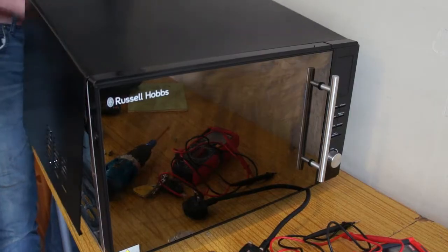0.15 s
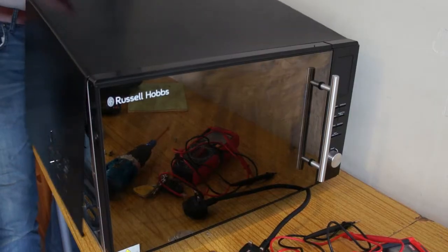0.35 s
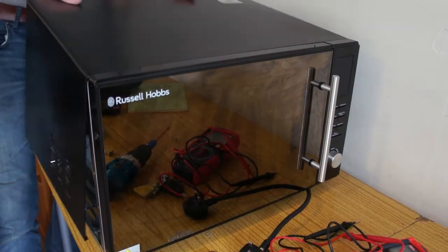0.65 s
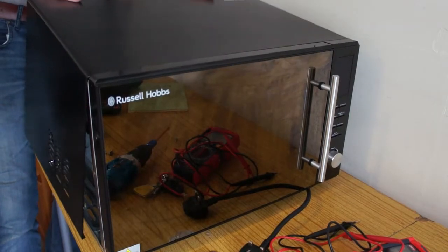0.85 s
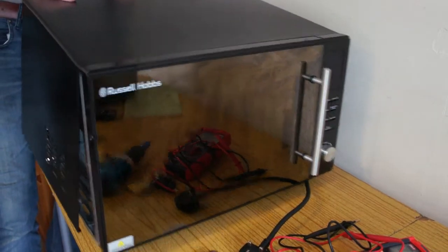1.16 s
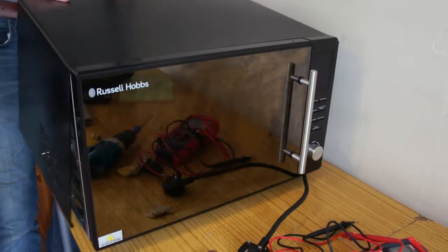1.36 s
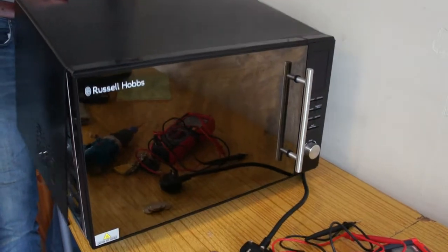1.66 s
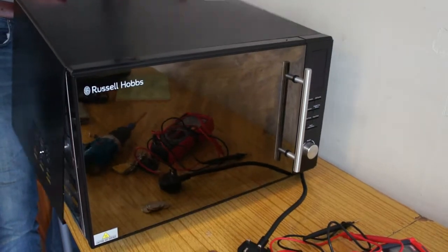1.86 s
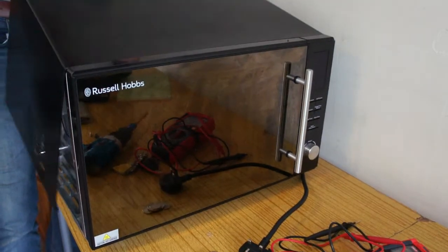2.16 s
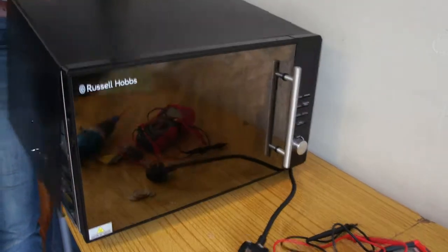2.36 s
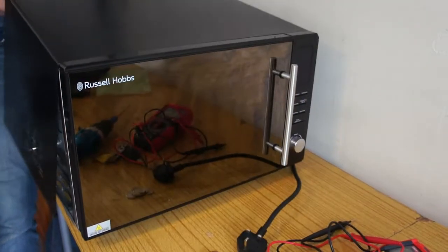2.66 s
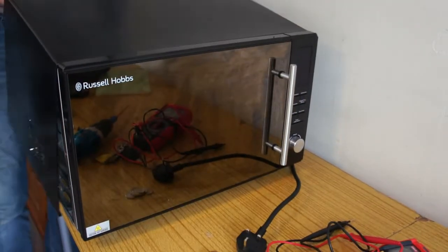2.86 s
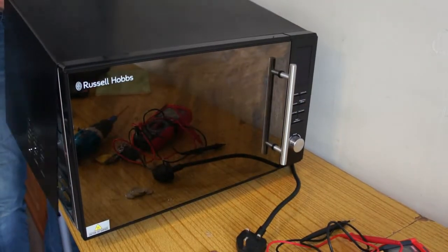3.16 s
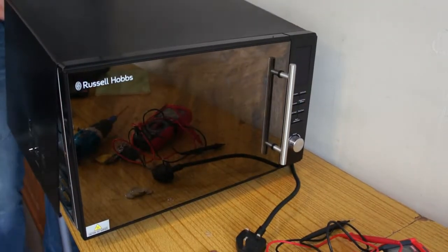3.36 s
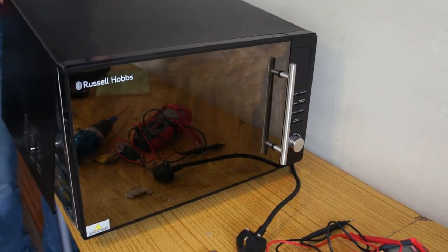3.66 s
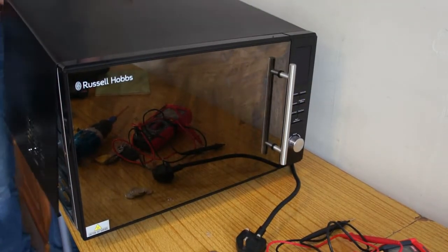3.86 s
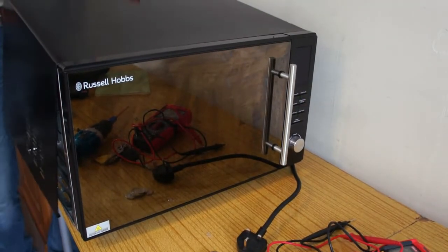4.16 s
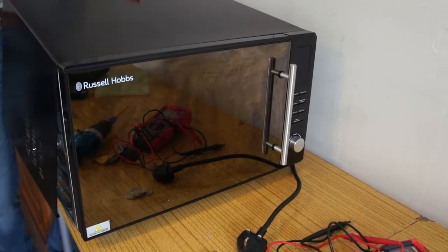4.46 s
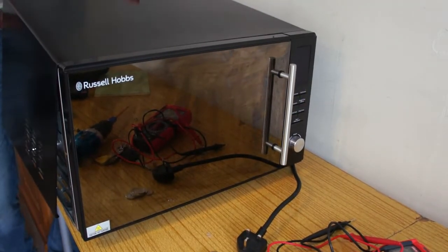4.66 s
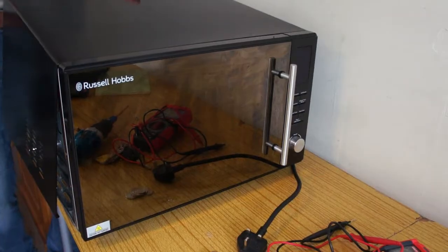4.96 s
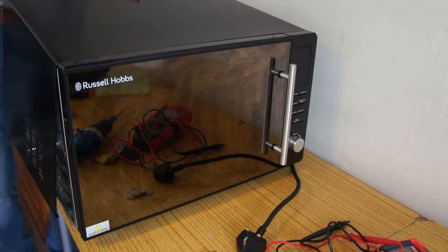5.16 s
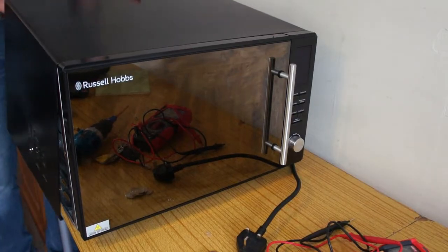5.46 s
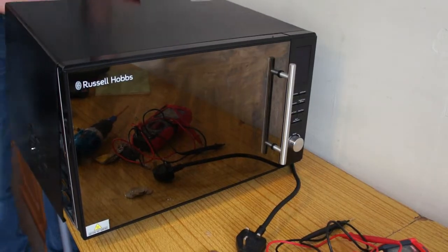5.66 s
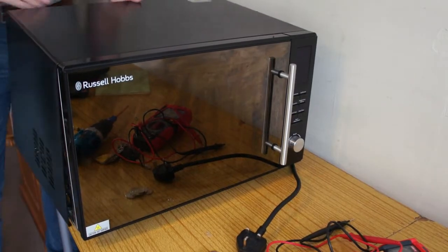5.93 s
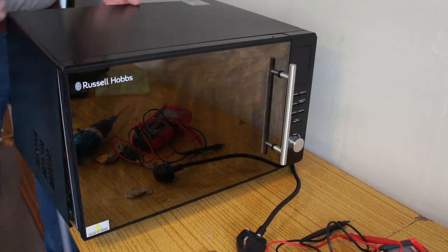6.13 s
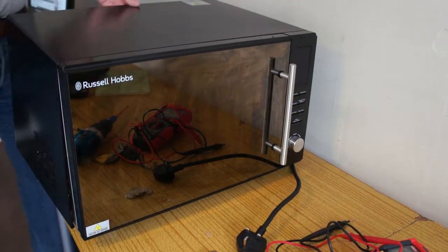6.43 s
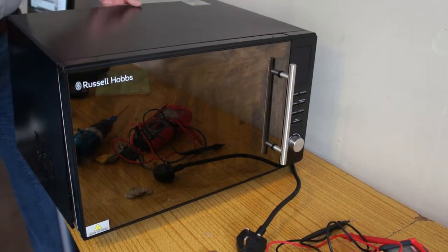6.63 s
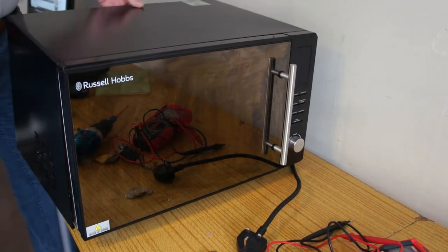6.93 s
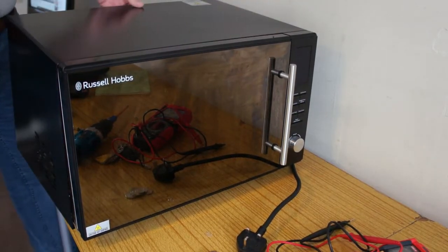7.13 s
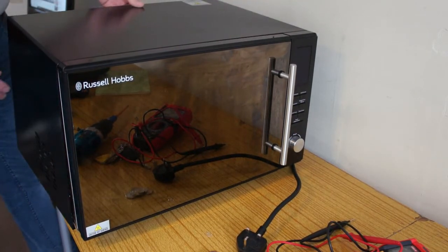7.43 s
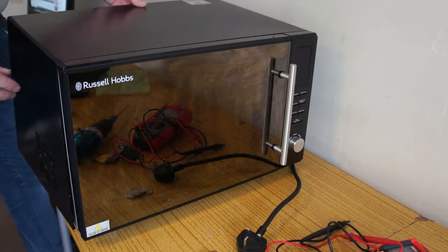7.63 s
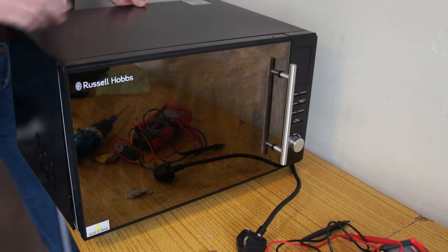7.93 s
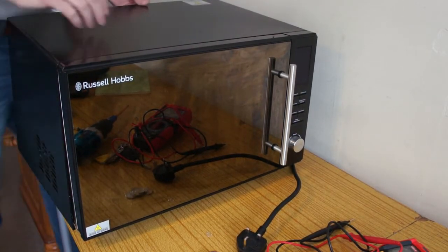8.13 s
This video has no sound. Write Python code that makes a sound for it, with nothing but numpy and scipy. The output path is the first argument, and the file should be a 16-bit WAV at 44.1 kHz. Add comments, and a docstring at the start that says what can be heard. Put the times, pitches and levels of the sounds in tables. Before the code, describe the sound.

A thin steel appliance cover is worked loose indoors, with loud clangs, scrapes and hollow booms early, then sparse light knocks and clicks.

```python
"""Sheet-steel cover worked loose

A thin steel cover comes off an appliance in a small room: its edges click, knock, scrape and squeak
on the chassis, and its big panels boom and pop. Shaped noise and tones follow timed contacts;
noise forces ring the modes of the sheet. The room answers briefly over a quiet hiss.
"""
import sys
import numpy as np
from scipy import signal
from scipy.fft import rfft, irfft, next_fast_len
from scipy.io import wavfile
from scipy.ndimage import map_coordinates

SR = 44100
rng = np.random.default_rng(int(sys.argv[2]) if len(sys.argv) > 2 else 0)


def digitize_waveform(pressure):
    """Quantize a signal to 16-bit integers and store it at the path in sys.argv[1].

    Rows of a 2-D input are taken as channels; values are limited to [-1, 1].
    """
    field = np.atleast_2d(pressure).T
    bounded = np.clip(field, -1, 1)
    quanta = np.round(bounded * 32767).astype(np.int16)
    wavfile.write(sys.argv[1], SR, quanta)


N = 365588


def amp(db):
    """Linear gain of a dB value."""
    return 10 ** (np.asarray(db) / 20)


def unit(x):
    """x scaled to rms 1."""
    return x / np.sqrt(np.mean(x ** 2, axis=-1, keepdims=True) + 1e-20)


def along(points, hz):
    """Interpolates (frequency [Hz], value) points on a log frequency axis."""
    f, v = np.transpose(points)
    return np.interp(np.log(hz + 1), np.log(f + 1), v)


def curves(rows, outside=None):
    """One value per sample for each column after the time."""
    s, *cols = np.transpose(rows)
    return [np.interp(np.arange(N) / SR, s, c, outside, outside) for c in cols]


def wobble(knots_per_s):
    """A smooth random curve."""
    knots = rng.standard_normal(int(N * knots_per_s / SR) + 4)
    return map_coordinates(knots, [np.arange(N) * knots_per_s / SR])


def filtered(x, response):
    """x times a complex response of frequency."""
    n = x.shape[-1]
    m = next_fast_len(n + 8192)
    return irfft(rfft(x, m) * response(np.fft.rfftfreq(m, 1 / SR)), m)[..., :n]


def coloured(x, points):
    """x with the given spectrum, rms 1."""
    return unit(filtered(x, lambda hz: amp(along(points, hz))))


def spread(pair, alike):
    """Two unrelated signals become left and right with a set correlation per frequency."""
    def turn(hz):
        return np.arccos(np.clip(along(alike, hz), -1, 1)) / 2
    mid, side = filtered(pair, lambda hz: np.array([np.cos(turn(hz)), np.sin(turn(hz))]))
    return np.array([mid + side, mid - side])


def gestures(s, held, db, rise, sag, fall):
    """Gain of gestures that rise, are held and die away at steady dB rates; their powers add."""
    t = np.arange(0, N + 64, 64) / SR
    since = t - np.reshape(s, (-1, 1))
    held, fall = np.reshape(held, (-1, 1)), np.reshape(fall, (-1, 1))
    shape_db = rise * np.minimum(since, 0)
    shape_db = shape_db - sag * np.clip(since, 0, held)
    shape_db = shape_db - fall * np.maximum(since - held, 0)
    power = np.sum(amp(np.reshape(db, (-1, 1)) + shape_db) ** 2, axis=0)
    return np.interp(np.arange(N) / SR, t, np.sqrt(power))


RADIATES_HZ = 250


def small(x):
    """A small source radiates little bass: second-order high-pass."""
    return filtered(x, lambda f: (1j * f / (RADIATES_HZ + 1j * f)) ** 2)


# modes of the cover: (frequency [Hz], width [Hz], level [dB])
SHEET_MODES = [(102, 7.7, -8), (169.3, 4.9, -3), (183.7, 23, 4), (254.3, 7.9, 10.5), (284.8, 5.5, 1.5),
               (364.5, 10.6, 4), (380.2, 12, -0.5), (430, 22, -6), (465.5, 44, 0), (536, 5.7, -14),
               (696, 74, -23), (672.7, 11, 8), (783, 3.5, -2), (897, 7, 3), (941, 21, -4.5),
               (991.6, 14, 6.5), (1133, 21, -0.5), (1206, 7.7, 6), (1314, 19, -12.5), (1323, 9.4, -2),
               (1370, 260, -9), (1562, 13, 8), (1666, 99, -5.5), (1768, 14, 5), (1835.5, 29, -1.5),
               (2025, 72, -20), (2165, 8.1, 2), (2454, 24, 3.5), (2660, 51, -7.5), (2910, 20, 8),
               (3080, 480, -6.5), (3157, 40, 7.5), (3557, 71, 0.5), (4310, 38, 7), (4913, 23, -12)]
LEAST_LOSS = .011  # least mode width as a share of its frequency: hands damp the sheet


def sheet(force, scatter_db=0):
    """The cover passes the force and rings at its modes; scatter gives each row its own mode strengths."""
    c, w, db = np.transpose(SHEET_MODES)[..., None]
    w = np.maximum(w, LEAST_LOSS * c)
    sign = (-1) ** np.arange(len(SHEET_MODES))
    gains = sign * amp(db[:, 0] + scatter_db)
    return filtered(force, lambda f: 1 + gains @ (1j * f * w / (c * c - f * f + 1j * f * w)))


# hiss colour: (frequency [Hz], relative level [dB])
HISS_COLOUR = [(25, -5), (50, -13), (100, -30), (130, -26), (170, -13), (280, -3), (600, -8), (1200, -4.5),
               (3000, -9.5), (6000, -14), (10000, -21), (16000, -33)]
# left-right likeness of diffuse sound: (frequency [Hz], correlation [0-1])
DIFFUSE_ALIKE = [(30, .6), (80, .985), (300, .97), (700, .88), (1500, .5), (3000, .02), (16000, .05)]


def hiss():
    """Room tone and microphone noise: steady coloured noise."""
    return amp(-55.5) * spread(coloured(rng.standard_normal((2, N)), HISS_COLOUR), DIFFUSE_ALIKE)


# reverberation: (frequency [Hz], t60 [s])
ROOM_T60 = [(150, 0.87), (500, 0.22), (1500, 0.41), (4000, 0.27), (10000, 0.3)]


def room(x):
    """Noise tails die at a rate set per frequency; each third of a second gets its own echo pattern."""
    hop, out = SR // 3, np.zeros((2, N + SR))
    delay = 200  # samples
    for start in range(0, N, hop):
        hz, t, z = signal.stft(rng.standard_normal((2, SR // 2)), SR, nperseg=256)
        decay = amp(-60 * t / along(ROOM_T60, hz)[:, None])
        tail = signal.istft(z * decay, SR, nperseg=256)[1]
        tail = tail / np.linalg.norm(tail[0])
        wet = signal.fftconvolve(x[None, start:start + hop], tail, axes=1)
        out[:, start + delay:start + delay + wet.shape[1]] += wet
    return spread(out[:, :N], DIFFUSE_ALIKE)


# panel buckling: (time at full strength [s], held [s], relative level [dB])
BUCKLES = [(.09, 0, -41), (.385, 0.12, -44.5), (.46, 0.31, -46), (.69, 0.024, -36.5), (.79, 0.12, -48),
           (1.172, 0.11, -29), (1.342, 0.064, -14.5), (1.49, 0.025, -22), (1.713, 0.15, -18),
           (1.974, 0, -20.5), (2.05, 0, -29), (2.15, 0.032, -37.5), (2.361, 0, -20), (2.467, 0.011, -19.5),
           (2.57, 0.108, -20.5), (2.749, 0.0082, -25), (2.841, 0.049, -34.5), (2.95, 0.12, -34.5),
           (3.12, 0.15, -41), (3.384, 0.047, -28), (3.529, 0.0062, -29.5), (3.6, 0.0082, -38),
           (3.72, 0.41, -42), (4.19, 0.35, -48), (4.47, 0.066, -41.5), (4.63, 0.29, -41.5),
           (4.92, 0.052, -40.5), (5.17, 0, -39), (5.4, 0.11, -41.5), (5.56, 0.2, -38.5), (5.7, 0.12, -39),
           (5.93, 0.023, -44), (6.05, 0.17, -44.5), (6.3, 0.29, -49), (6.432, 0.049, -46), (6.54, 0, -42),
           (6.82, 0.03, -54.5), (6.98, 0, -50), (7.1, 0, -58), (7.69, 0.025, -49)]
# trembling in the hands: (time [s], relative rustle level [dB], relative deep rumble level [dB])
TREMBLES = [(0, -43.5, -68), (.2, -51.5, -70), (.4, -44.5, -43), (.7, -53.5, -74), (1.15, -51.5, -53.5),
            (1.55, -38.5, -53), (1.9, -25.5, -30.5), (2.2, -42.5, -45), (2.52, -20, -26.5),
            (2.75, -32, -38), (3.15, -53, -43.5), (3.55, -39.5, -55), (4.25, -54, -54), (4.66, -55, -50),
            (4.8, -43, -46.5), (5.47, -47, -62), (5.7, -34.5, -70), (5.86, -49.5, -67.5),
            (6.83, -52.5, -54.5), (7.6, -57, -67), (7.99, -57, -85), (8.15, -47, -87), (8.29, -63, -82)]
# colours of the forces: (frequency [Hz], relative level [dB])
BOOM_COLOUR = [(60, -59), (110, -8), (160, -0.5), (300, 3), (500, -1.5), (900, -24), (3000, -79.5)]
DEEP_COLOUR = [(20, -47), (50, -33.5), (80, -2.5), (110, -11), (150, 0), (300, -72)]
RUSTLE_COLOUR = [(70, -37), (150, -8), (260, 2.5), (450, 3), (900, 1.5), (1600, -5.5), (3200, -9.5),
                 (4500, -13.5), (12000, -30.5)]
SWELL_DB_PER_S, SAG_DB_PER_S, DAMP_DB_PER_S = 536, 17, 172  # rise, loss while held, decay
DEEP_DB, DEEP_DAMP_DB_PER_S = -16, 64  # the lowest modes start weaker and ring longer


def panels():
    """Buckling drives the low modes in lumps; trembling adds deep rumble and a rustle of loose edges."""
    s, held, db = np.transpose(BUCKLES)
    rustle_db, rumble_db = curves(TREMBLES)
    forces = []
    for colour in (BOOM_COLOUR, DEEP_COLOUR, RUSTLE_COLOUR):
        lumps = rng.standard_normal((2, N)) * amp(2.45 * wobble(26))
        forces.append(coloured(lumps, colour))
    boom, deep, rustle = unit(sheet(np.array(forces)))
    booming = gestures(s, held, db, SWELL_DB_PER_S, SAG_DB_PER_S, DAMP_DB_PER_S)
    ringing = gestures(s, held, db + DEEP_DB, SWELL_DB_PER_S, SAG_DB_PER_S, DEEP_DAMP_DB_PER_S)
    return booming * boom + np.hypot(ringing, amp(rumble_db)) * deep + amp(rustle_db) * rustle


# panel snap-throughs: (time [s], relative level [dB], frequency [Hz], t60 [s])
PANEL_POPS = [(1.323, -13, 290, 0.11), (1.66, -3, 169.7, 0.14), (1.697, -19, 182, .15),
              (2.352, -11.5, 165.4, 0.13), (2.355, -11, 366, 0.22), (2.452, -7.5, 141, 0.079),
              (2.468, -9, 223, .08), (2.546, -11, 375, .08), (2.568, -23, 179, 0.13),
              (3.368, -20, 455, 0.19), (3.373, -24, 255.3, 0.46), (6.667, -48, 179, .08),
              (6.817, -34, 192, .05), (6.929, -36, 200, 0.064), (7.101, -37, 200, 0.056)]
POP_RISE_S = 0.0028


def pops():
    """A panel snaps through: one low mode, pushed softly and quickly damped by the hands."""
    t, out = np.arange(SR // 2) / SR, np.zeros(N + SR)
    for s, db, hz, t60 in PANEL_POPS:
        envelope = amp(db - 60 * t / t60) * (1 - np.exp(-t / POP_RISE_S))
        out[round(s * SR):][:len(t)] += envelope * np.sin(2 * np.pi * hz * t)
    return out[:N]


# edge squeaks: (time [s], held [s], pitch [Hz], glide [Hz/s], relative fundamental level [dB],
# relative level of each overtone [dB], pitch unsteadiness [share of pitch])
SLIP_SQUEAKS = [(1.264, 0.056, 1174, -210, -53, -38.5, 0.07), (3.322, 0.04, 794, 6500, -29.5, -46, 0.05),
                (8.058, 0.123, 1305, -500, -50.5, -78, 0.04)]
SQUEAK_EDGE_DB_PER_S = 700  # rise and fall


def squeak():
    """The slipping edge sounds slightly unsteady gliding tones with three overtones."""
    out, edge = np.zeros(N), SQUEAK_EDGE_DB_PER_S
    for s, held, hz, glide, db, overtones_db, unsteady in SLIP_SQUEAKS:
        gliding = hz + glide * np.clip(np.arange(N) / SR - s, 0, held)
        pitch = gliding * (1 + unsteady * wobble(130))
        phase = 2 * np.pi * np.cumsum(pitch) / SR
        overtones = sum(np.sin(k * phase) for k in range(2, 5))
        tone = amp(db) * np.sin(phase) + amp(overtones_db) * overtones
        out += np.sqrt(2) * gestures(s, held, 0, edge, 0, edge) * amp(1.6 * wobble(90)) * tone
    return out


# sliding strokes: (time at full force [s], held [s], relative level [dB], fade [dB/s],
# clang re scrape [dB], brightness re scrape [dB])
SLIDES = [(.678, 0.13, -41.5, 69, -17, -10.5), (.8, 0.16, -55, 150, 1, 4.5),
          (1.174, 0, -32.5, 106, -17, -11.5), (1.24, 0.15, -40, 400, -1.5, -7.5),
          (1.337, 0.074, -19.5, 334, 0, -6), (1.484, 0.022, -26, 188, -5.5, -18),
          (1.608, 0.032, -25, 396, -4.5, -29), (1.668, 0.034, -23.5, 502, -12, -15),
          (1.709, 0.044, -16.5, 200, -3, -6), (1.828, 0, -23.5, 103, -5.5, -22),
          (1.988, 0, -31, 191, -3.5, -9.5), (2.03, 0, -43.5, 11, -5, -6),
          (2.325, 0.05, -36.5, 398, -6.5, -16), (2.362, 0, -23.5, 202, -3, -10.5),
          (2.4, 0.0062, -37, 400, 4, -2), (2.463, 0, -17, 405, -1, -24), (2.493, 0.081, -21, 262, 2, -5),
          (2.539, 0.071, -21.5, 300, 3, -1), (2.59, 0.042, -23, 295, -0.5, -6),
          (2.66, 0.051, -28, 170, -6, -23), (3.318, 0.084, -35.5, 400, -17, -24),
          (3.334, 0, -29, 168, -13.5, -14), (3.425, .18, -34.5, 346, -39, -16.5),
          (3.84, 0, -56.5, 206, -14, 9.5), (3.99, 0.00047, -40, 302, -48, -20),
          (4.639, 0.037, -33.5, 300, -4.5, -43), (5.33, 0.0085, -51.5, 300, -4, -9),
          (5.565, 0.058, -39.5, 300, -41, -17.5), (5.652, 0, -35, 67, -13, -9.5),
          (5.7, 0.12, -57, 124, 0, 6.5)]
# colours of the forces, the last two also for knocks: (frequency [Hz], relative level [dB])
GRIT_COLOUR = [(150, -6), (450, 0), (900, 6), (1700, -5.5), (2600, -11), (6000, -94.5)]
CLANG_COLOUR = [(800, -22.5), (1900, -5), (2500, -0.5), (3400, -2.5), (4300, -9), (6500, -16), (9000, -36)]
SNAP_COLOUR = [(1500, -50), (3500, -8), (5000, 0), (7500, -6), (10000, -11), (16000, -23)]
GRIP_DB_PER_S, TIRE_DB_PER_S = 889, 60  # a stroke bites fast and slackens while held
SHIFT_PER_S, SHIFT_DB, SCRAPE_DB = 14, 13, -2.5  # rate and range of mode changes; gain


def scrape():
    """Dense uneven slips of steel on steel shake the sheet; the travelling contact drives other modes."""
    slips = (rng.random(N) < .008) * amp(4.5 * np.minimum(rng.exponential(size=N), 3))
    clumps = amp(0.45 * wobble(35.04) + 1.94 * wobble(150))
    force = (unit(slips) + 1.35) * clumps * rng.standard_normal((2, N))
    s, held, level_db, fade, clang_db, bright_db = np.transpose(SLIDES)
    layers = ((GRIT_COLOUR, level_db), (CLANG_COLOUR, level_db + clang_db),
              (SNAP_COLOUR, level_db + bright_db))
    driven = np.zeros((2, N))
    for colour, db in layers:
        gain = gestures(s, held, db, GRIP_DB_PER_S, TIRE_DB_PER_S, fade)
        driven += gain * coloured(force, colour)
    # three contact spots with their own mode strengths share constant power
    spots = amp([10 * wobble(SHIFT_PER_S) for _ in range(3)])
    spots = spots / np.linalg.norm(spots, axis=0)
    scatter_db = SHIFT_DB * (rng.random((3, len(SHEET_MODES))) - .5)
    return amp(SCRAPE_DB) * sheet(driven[:, None] * spots, scatter_db).sum(axis=1)


# contacts that catch one mode: (time [s], relative level [dB], nearest mode frequency [Hz])
CAUGHT_MODES = [(1.31, -25, 3535), (1.321, -18, 996), (1.323, -10, 1450), (1.35, -31, 1000),
                (1.385, -14, 2180), (1.708, -17, 3535), (1.697, -22, 4950), (1.724, -20, 4950),
                (1.726, -20.5, 2890), (1.722, -10, 675), (1.815, -18, 1138), (1.831, -19, 1300),
                (1.84, -20, 2890), (1.84, -25, 4950), (2.35, -13, 1660), (2.41, -17, 1150),
                (2.453, -8, 4950), (2.454, -12, 1000), (2.486, -21, 4950), (2.375, -24, 3540),
                (2.509, -8, 3155), (2.535, -12, 3540), (2.56, -18, 2910), (2.594, -17, 3155),
                (2.73, -14.5, 464), (2.929, -18.5, 464), (2.93, -28, 640), (2.931, -18, 1390),
                (3.019, -33, 1960), (3.702, -29.5, 885), (3.704, -28, 1390), (4.149, -21, 464),
                (4.15, -33, 640), (4.177, -27, 464), (4.354, -36, 1550), (4.591, -23.5, 1960),
                (4.632, -22, 1660), (4.647, -25, 2650), (4.648, -26, 2910), (4.688, -29, 1000),
                (4.699, -33, 1000), (4.895, -33, 1780), (4.915, -20, 2890), (4.93, -27, 3155),
                (4.918, -25, 1000), (5.163, -43, 885), (5.168, -28, 1960), (5.173, -35, 1300),
                (5.178, -24, 2650), (5.184, -33, 2180), (5.198, -27, 1780), (5.22, -31, 2650),
                (5.246, -29.5, 2650), (5.386, -31, 464), (5.387, -33, 640), (6.034, -40, 1450),
                (6.341, -42, 1450), (6.652, -39, 1450), (6.664, -40, 464), (6.719, -33, 1450),
                (6.72, -44, 2650), (6.807, -36, 464), (6.922, -47, 464), (6.968, -39, 1450),
                (6.975, -40, 1000), (6.968, -32, 2650), (7.089, -44, 464), (7.357, -40, 1450),
                (7.941, -28, 1450), (7.944, -32, 2650), (7.948, -40, 2180), (8.2, -30.5, 940),
                (8.226, -29, 1450), (8.226, -41, 2650), (8.23, -46, 2180)]
RING_RISE_S, FLUTTER_DB = 0.00036, 2.2  # hands make the modes flutter


def rings():
    """Single modes of the sheet, each dying at the rate its width gives."""
    s, db, near_hz = np.transpose(CAUGHT_MODES)[..., None]
    modes = np.array(SHEET_MODES)
    nearest = np.argmin(np.abs(modes[:, 0] - near_hz), axis=1)
    hz, width = modes[nearest, :2].T[..., None]
    width = np.maximum(width, LEAST_LOSS * hz)
    t, out = np.arange(SR // 3) / SR, np.zeros(N + SR)
    envelope = amp(db) * np.exp(-np.pi * width * t) * (1 - np.exp(-t / RING_RISE_S))
    tones = envelope * np.sin(2 * np.pi * hz * t)
    for start, tone in zip(s[:, 0], tones):
        out[round(start * SR):][:len(t)] += tone
    return small(out[:N]) * amp(FLUTTER_DB * wobble(110))


# edge on chassis: (time [s], relative level [dB], relative thud level [dB], relative clang level [dB],
# relative snap level [dB], strongest ring [Hz])
CONTACTS = [(.052, -24.5, -15, 2.5, -9, 1360), (0.078, -26.5, -6, 1.5, -30, 970),
            (0.347, -25.5, -16, 0.5, -28, 1300), (0.382, -26, -7, -6.5, -31, 1010),
            (0.765, -30.5, -1.5, -0.5, -9.5, 1170), (1.107, -28, -20, -3.5, -13, 1090),
            (1.186, -24, -21, -23, -22, 930), (1.308, -26, -10, 11.5, 6, 2100),
            (1.322, -4.5, -0.5, -5.5, -6, 1010), (1.35, -5, -18, -29, -5.5, 706),
            (1.364, -20, -12, -2, -9, 1200), (1.382, -16.5, -7, 1, -3.5, 2000),
            (1.397, -11.5, -10, 3.5, -15, 1500), (1.593, -20.5, -19, 1.5, -22, 1420),
            (1.696, -12, -1, -2, -8, 960), (1.706, -18.5, -15, 6, -14, 1190),
            (1.725, -13, -17, 3, 0.5, 935), (1.768, -22, -8, 5, -10, 1500), (1.81, -21, -22, -2, -26, 1110),
            (1.839, -16.5, -9, 3.5, -20, 1100), (1.973, -15.5, 0, -19, -21, 710),
            (2.097, -22, -7, 6.5, -16, 1470), (2.346, -15.5, -24, 1, -24, 1580),
            (2.372, -20, 4.5, 3.5, -8, 1110), (2.417, -33, -12, 9, -10.5, 1100),
            (2.439, -22.5, -8, 11, -11, 1000), (2.453, -8, 0, 1, -3.5, 920),
            (2.486, -15.5, -19, 10.5, 8, 1370), (2.732, -24.5, 5, 3, -30.5, 1260),
            (2.927, -23, 6.5, -19, -20, 710), (3.018, -21, -6, -2, -12, 1700),
            (3.159, -43, 16, -23, -24, 734), (3.218, -38.5, -22, 8, -4, 1840),
            (3.324, -36.5, 4, -16, -26, 780), (3.353, -31, 8.5, -19, -5.5, 1010),
            (3.42, -29, -3, -5, -28, 834), (3.702, -25.5, -10, 0.5, -37, 850),
            (3.912, -32, 4, -26, -18, 720), (4.148, -29.5, 11, -14, -35, 750),
            (4.177, -41, 15.5, -4, -20, 810), (4.199, -33.5, 11.5, -0.5, -8, 915),
            (4.355, -26.5, -11, -1.5, -19, 1530), (4.389, -33.5, 1.5, -5, -27, 1750),
            (4.457, -38.5, 7.5, 2.5, -13, 700), (4.521, -37.5, -1, -3, -19, 740),
            (4.591, -33, -1, 0, -31, 2110), (4.63, -21.5, -22, -3, -30, 1680),
            (4.647, -33, -20, -3, -30, 1040), (4.684, -25.5, 4, -11, -35, 950),
            (4.806, -41.5, 7, 9, -4, 729), (4.849, -45, 8, 9, -3, 704), (4.889, -26, -2, -2, -17, 1660),
            (4.896, -22.5, -8, 4, -11, 1000), (4.914, -25, 0.5, 7, -28, 970),
            (5.05, -33, -20, -2, -23, 780), (5.161, -27, -15, -6, -25, 1300),
            (5.169, -22, -11, -3, -20, 895), (5.179, -21.5, -7.5, 3, -5, 1330),
            (5.219, -51, -15, -4, -16, 900), (5.244, -54, -15, 4, -20, 1300),
            (5.385, -34, 14, -33, -35, 770), (5.649, -22.5, -2.5, -7, -26, 860),
            (5.709, -28.5, 7, -16, -22, 764), (5.739, -27, 2, -22, -18, 1000),
            (6.033, -29, -17, 1.5, -13, 1270), (6.056, -28, -3, -10, -32, 1530),
            (6.19, -39, -24, -6, -8, 1380), (6.341, -29, -4.5, 0.5, -25, 1530),
            (6.419, -45.5, 10, -19, -24, 1050), (6.652, -33, -19, -11, -29, 1470),
            (6.666, -46.5, 6, -15, -29, 900), (6.719, -44, -16, 3, -24, 1580),
            (6.807, -52, 8, -17, -21, 732), (6.92, -48, 7, -13, -21, 727),
            (6.967, -27.5, -24, -5, -36, 1340), (7.091, -63, -1, -22, -33, 720),
            (7.311, -41.5, -15, 2, 4.5, 2140), (7.357, -33, -17, -4, -24, 1470),
            (7.644, -39.5, -1, -10, -16, 900), (7.683, -28.5, -7.5, -5.5, -32, 1130),
            (7.926, -33.5, -11, -16, -27, 840), (7.943, -23.5, -13, 2.5, -21, 1350),
            (7.996, -31.5, -2, -6, -31, 950), (8.198, -29, -10, 1, -22, 910),
            (8.226, -24.5, -8.5, 4, -12, 1270)]
# colours of the forces: (frequency [Hz], relative level [dB])
THUD_COLOUR = [(40, -46.5), (150, -7.5), (400, 2), (700, 3), (1300, -5), (4000, -87)]
BODY_COLOUR = [(150, -71.5), (500, -10.5), (900, 3), (1700, -0.5), (2600, -3.5), (6000, -77)]
RING_T60_S, PUSH_HZ = 0.27, 468  # decay of the sheet, spring-back of the contact
CRACK_DB, SNAP_CRACK_DB = 1.5, 14  # excess at the start: crack, treble spike


def knocks():
    """The contact point cracks and springs back; the sheet's dense modes die away, clang and snap faster."""
    s, db, thud_db, clang_db, snap_db, ring_hz = np.transpose(CONTACTS)[..., None]
    t, t60 = np.arange(SR // 3) / SR, RING_T60_S
    noise = rng.standard_normal((len(s), 3, 2, len(t))).transpose(1, 2, 0, 3)
    crack = 1 + amp(CRACK_DB - 60 * t / 0.028)
    snap_crack = 1 + amp(SNAP_CRACK_DB - 60 * t / 0.0086)
    thud = amp(thud_db - 60 * t / t60) * coloured(noise[0], THUD_COLOUR)

    def favour(f):
        """Where the edge is struck favours one region of the modes."""
        return 1 + .9 * np.exp(-(np.log((f + 1) / ring_hz) / 0.16) ** 2)
    struck = unit(filtered(coloured(noise[1], BODY_COLOUR), favour))
    body = amp(-60 * t / t60) * struck
    clang = amp(clang_db - 60 * t / (0.61 * t60)) * coloured(noise[0], CLANG_COLOUR)
    snap = amp(snap_db - 60 * t / (0.81 * t60)) * coloured(noise[2], SNAP_COLOUR)
    push = 2.6 * amp(thud_db + CRACK_DB - 60 * t / .035) * np.sin(2 * np.pi * PUSH_HZ * t)
    click = 3.7 * amp(CRACK_DB - 60 * t / 0.0088) * np.sin(2 * np.pi * ring_hz * t)
    point = small(push + click) * np.array([1, 0])[:, None, None]  # a point source has no width
    scatter_db = 6 * (rng.random((len(s), len(SHEET_MODES))) - 1)
    ringing = sheet(thud + crack * (body + clang) + snap_crack * snap, scatter_db)
    hits = amp(db - 9.0) * (1 - np.exp(-t / 0.00029)) * (point + ringing)
    out = np.zeros((2, N + SR))
    for k, start in enumerate(s[:, 0]):
        out[:, round(start * SR):][:, :len(t)] += hits[:, k]
    return out[:, :N]


# where the hands work: (time [s], weight of the lagging copy [0-1])
HAND_PLACE = [(0, 0.63), (.9, 0.24), (1.2, 0.81), (2.9, 1), (3.2, 0.26), (8.29, 0.21)]
# left-right likeness of the broad sheet: (frequency [Hz], correlation [0-1])
SHEET_ALIKE = [(30, .8), (100, .99), (300, .99), (700, .95), (1500, .7), (3000, .35), (16000, .35)]
# port balance: (frequency [Hz], left over right [dB])
PORT_LEAN = [(100, .7), (1000, .5), (2500, -1.2), (10000, -.8)]
LAG_S = .00007  # left after right in the lagging copy


def scene():
    """The cover reaches two close ports directly and by way of the walls."""
    centred = pops() + rings() + squeak()
    pair = knocks() + scrape() + panels() + centred * [[1], [0]]
    aside, = curves(HAND_PLACE)
    aside, half = np.clip(aside, 0, 1), np.array([[.5], [-.5]])
    ahead = filtered(spread(pair, SHEET_ALIKE), lambda hz: amp(along(PORT_LEAN, hz) * half))
    lagging = filtered(ahead, lambda hz: np.exp(-2j * np.pi * hz * LAG_S * half))
    direct = aside * lagging + (1 - aside) * ahead
    return amp(-3.0) * direct + amp(-10.5) * room(pair[0]) + hiss()


# microphone bass roll-off: (frequency [Hz], level [dB])
MIC_RESPONSE = [(10, -47.5), (30, -21.5), (60, -12), (100, -1), (20000, -0.5)]
TOP_HZ = 16000


def record(dry):
    """The microphone loses deep bass, rounds off the loudest peaks and passes nothing above its band limit."""
    heard = filtered(dry, lambda hz: amp(along(MIC_RESPONSE, hz)))
    clipped = heard / (1 + np.abs(heard) ** 8) ** (1 / 8)
    return filtered(clipped, lambda hz: hz < TOP_HZ)


dry = scene()
out = record(dry)
digitize_waveform(out)
```